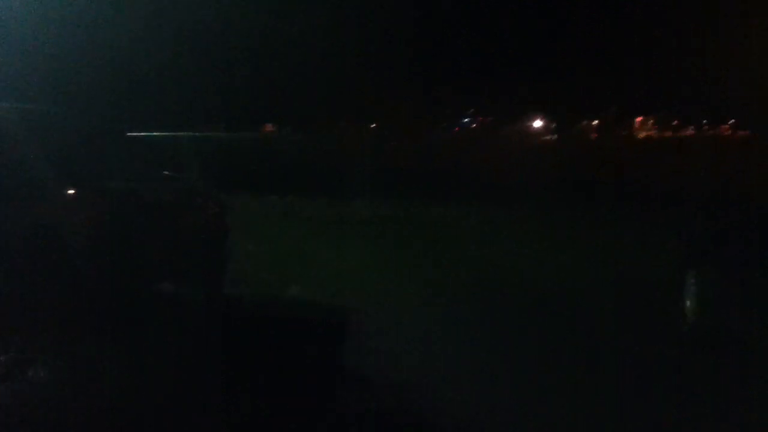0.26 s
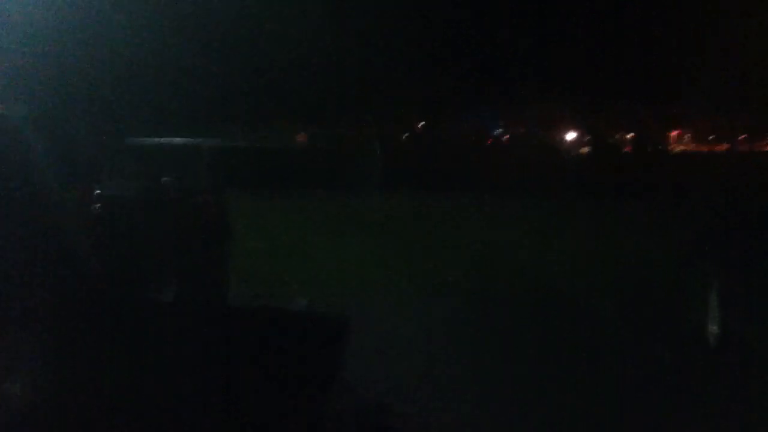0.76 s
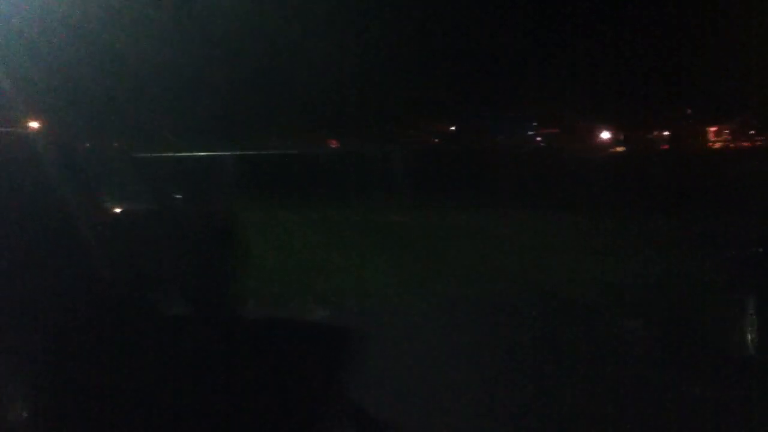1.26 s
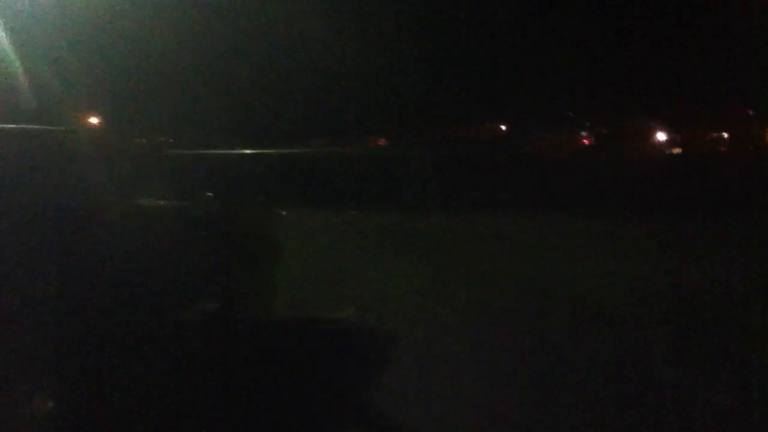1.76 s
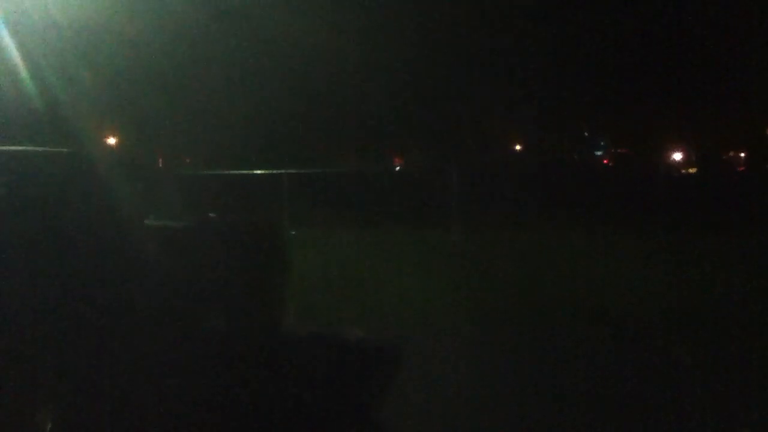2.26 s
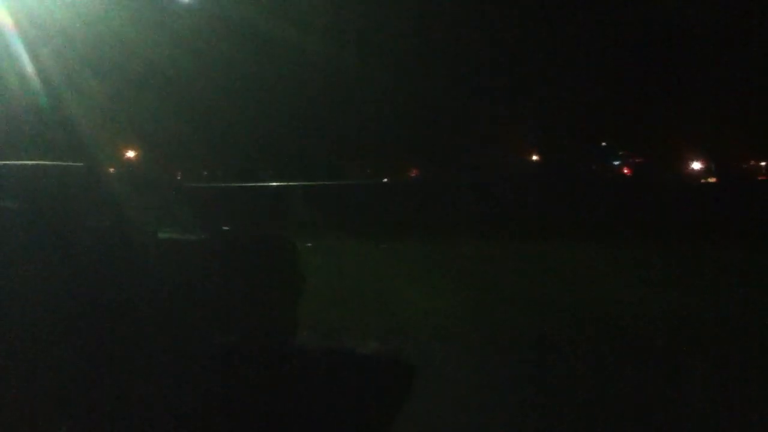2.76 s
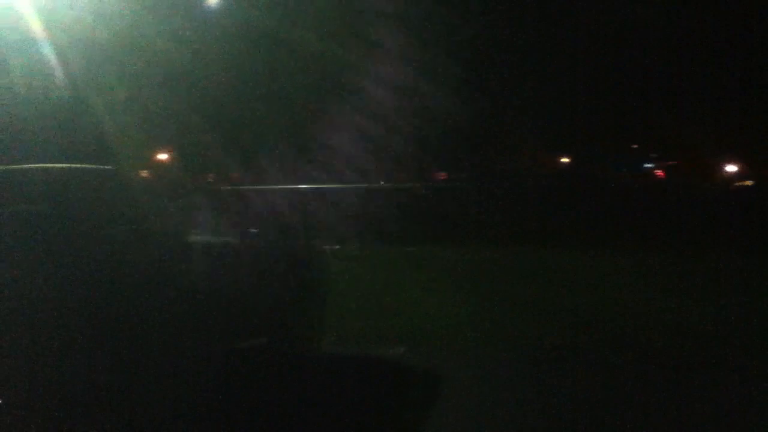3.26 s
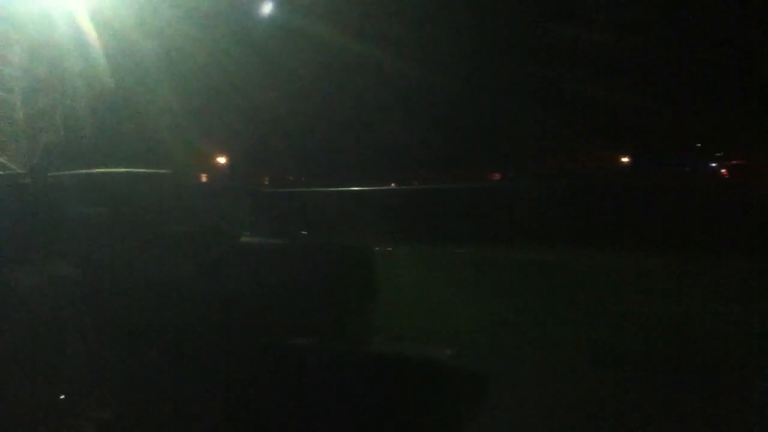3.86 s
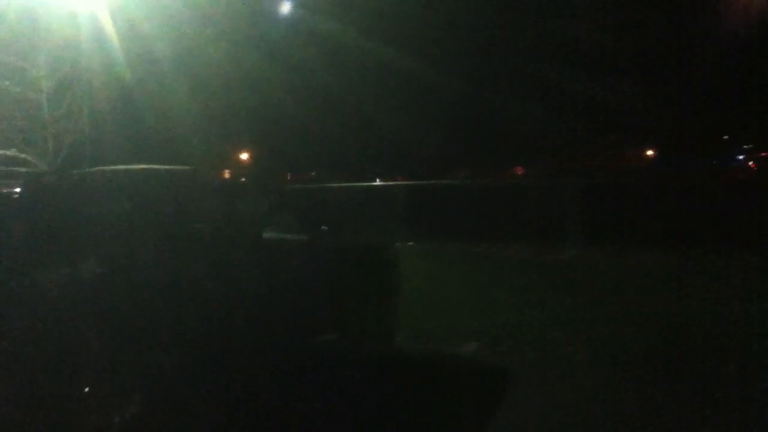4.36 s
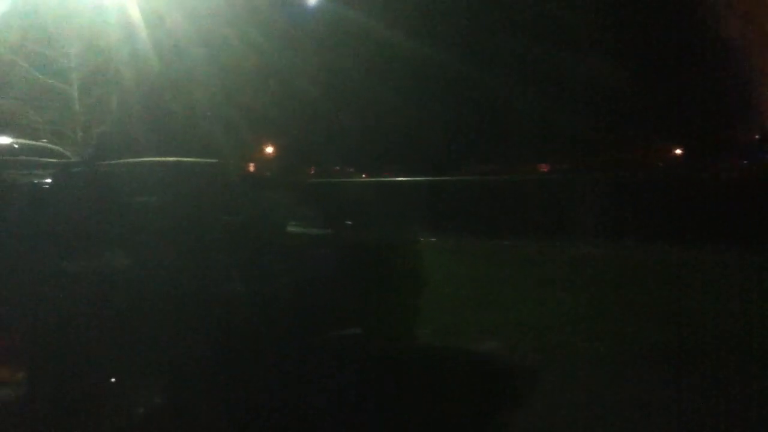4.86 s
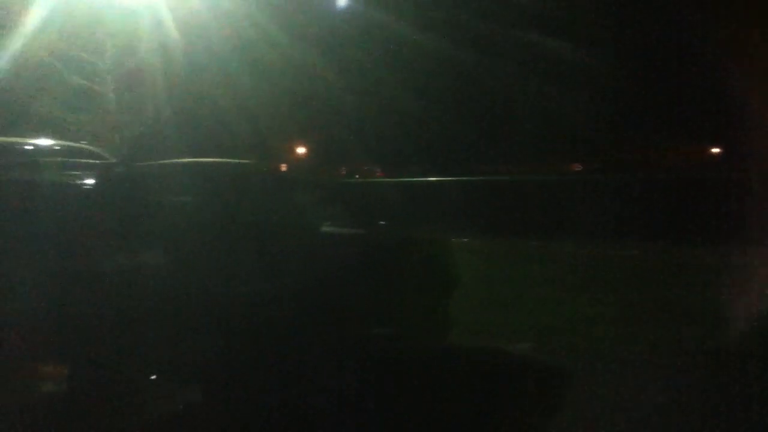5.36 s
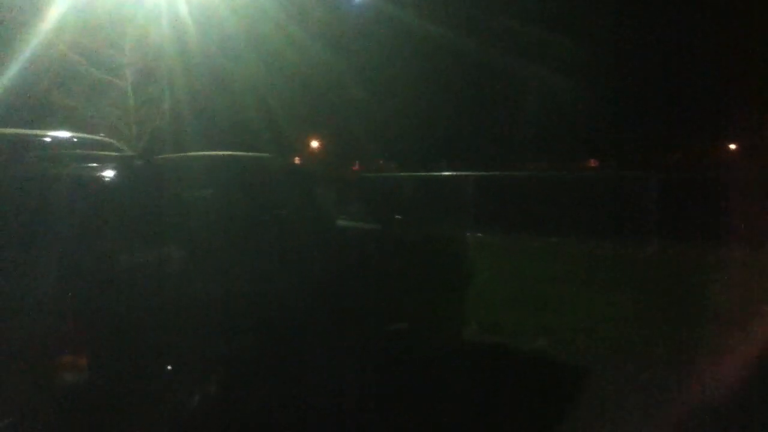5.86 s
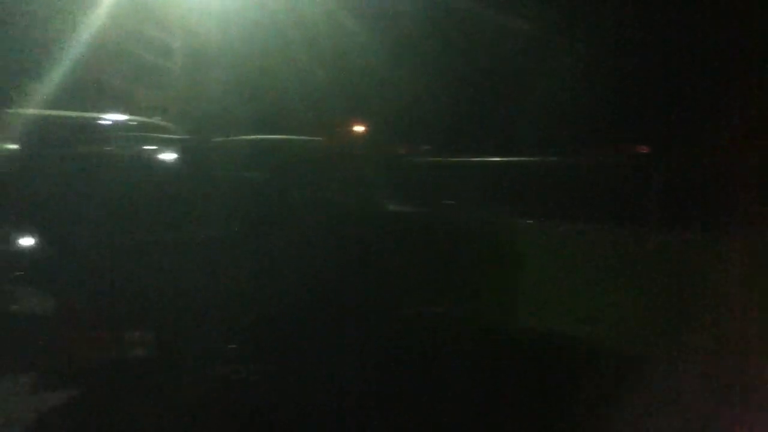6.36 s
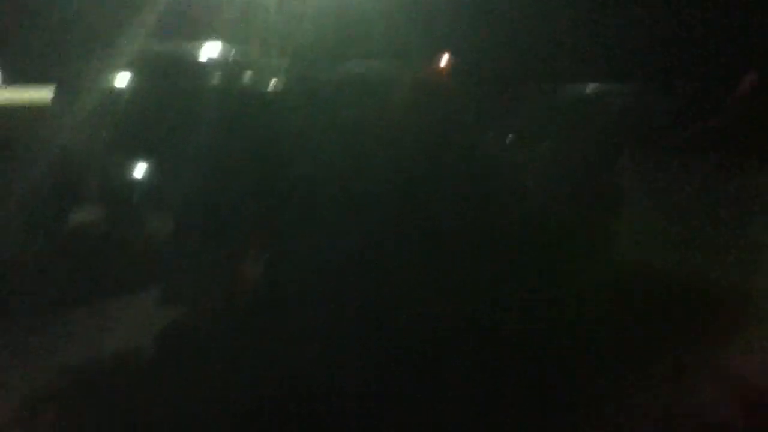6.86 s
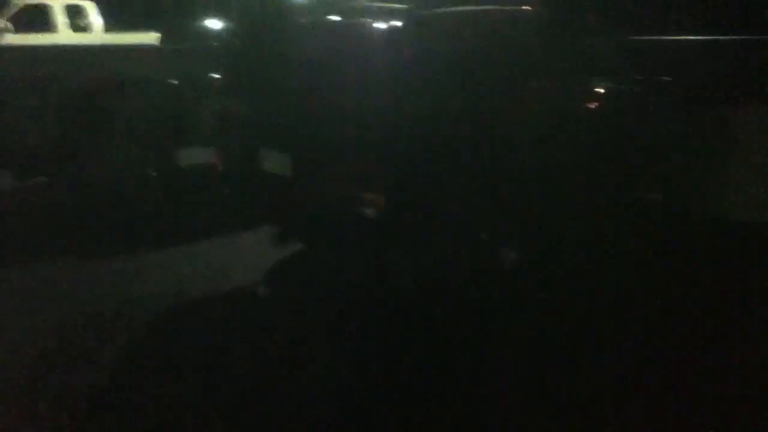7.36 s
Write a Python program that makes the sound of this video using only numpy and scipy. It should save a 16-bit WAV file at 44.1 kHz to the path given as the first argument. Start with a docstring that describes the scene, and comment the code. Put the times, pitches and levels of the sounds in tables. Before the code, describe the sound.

A pickup truck with an open exhaust pulls hard across an outdoor lot, its low drone rising in pitch. It shifts up, the pitch drops, and it climbs again, growing louder, raspier and more crackly. Then the throttle shuts and the revs fall to a quiet burble. At the very end a sharp knock and a few small taps hit the microphone, briefly muffling the sound.

```python
"""An open lot at night: a straight-piped pickup pulls through two gears, then lifts off.
Its periodic firing gives a harmonic drone. Uneven pulses of turbulent gas excite the pipe into a burble,
a bark and a rasp, which the lot scatters; under load the pulses steepen into cracks.
A faint electronic hiss lies beneath. At the end a hand knocks a camera and covers its microphone."""
import sys
import numpy as np
from scipy import signal
from scipy.fft import rfft, irfft
from scipy.io import wavfile

SR = 44100
rng = np.random.default_rng(int(sys.argv[2]) if len(sys.argv) > 2 else 0)


def store_wav(level_fs):
    """Save 16-bit WAV to argv[1]."""
    pcm = np.round(np.clip(np.atleast_2d(level_fs), -1, 1) * 32767)
    wavfile.write(sys.argv[1], SR, pcm.T.astype(np.int16))


N = 336042
TIME = np.arange(N) / SR

# one cylinder bank's pulse rate in each gear; it flares as the clutch bites: (time [s], rate [Hz])
LOW_GEAR_RATE = [(0, 93.2), (.25, 97.8), (.5, 100.4), (1, 103), (1.4, 106.3), (1.7, 107.5), (2.0, 112)]
HIGH_GEAR_RATE = [(1.9, 61.7), (2.08, 70.5), (2.22, 68.3), (3, 78.5), (4.25, 94.3), (4.5, 96.5),
                  (5.5, 108.3), (5.7, 109.3), (6.08, 108.6)]
# throttle shut, revs falling: (time [s], bank pulse rate [Hz], level [dB])
OVERRUN = [(5.62, 109.1, -55), (5.75, 101.4, -29), (5.9, 92.76, -38), (6.05, 76.95, -41), (6.2, 67.07, -40),
           (6.4, 69.88, -49), (7.2, 79.63, -50.5), (7.62, 78.2, -59)]
# pipe resonances that shape the low-gear drone: (frequency [Hz], level [dB])
PIPE_RESPONSE = [(90, -34), (98, -30.5), (120, -29), (182, -27.5), (198, -34.5), (224, -31), (276, -47),
                 (290, -41), (322, -40), (338, -47), (364, -39.5), (410, -54.5), (450, -54)]
# strength of that drone: (time [s], gain [dB])
DRONE_DRIVE = [(0, -3), (.6, -10.5), (1.1, -10.5), (1.7, -4), (2.0, -3)]
# uneven firing in low gear: (multiple of half the bank pulse rate, level [dB])
HALF_ORDERS = [(3, -49), (5, -52)]
# weak orders from unequal cylinders: (multiple of the engine cycle rate, level [dB])
SIDE_ORDERS = [(4, -48), (5, -53), (8, -58)]
# the bank's fundamental in high gear: (time [s], level [dB])
BANK_NOTE = [(1.9, -49.5), (2.75, -53), (2.9, -43), (3.1, -49), (3.25, -37), (3.38, -44), (3.48, -38.5),
             (3.85, -43), (3.96, -31), (4.07, -37), (4.17, -31.5), (4.26, -34), (4.46, -26), (4.6, -32),
             (4.73, -26), (4.83, -28.5), (4.91, -41.5), (5.08, -29.5), (5.18, -34.5), (5.28, -29.5),
             (5.37, -27), (5.44, -32.5), (5.56, -28), (5.7, -33.5), (5.88, -30), (6.04, -39), (6.08, -57)]
# throbs of the firing note, an octave higher: (time [s], half length [s], peak level [dB])
THROBS = [(1.945, 0.033, -30), (2.076, 0.069, -26), (2.287, 0.042, -28.5), (2.442, 0.067, -27.5),
          (2.664, 0.09, -25), (2.884, 0.1, -31), (3.023, 0.058, -31), (3.198, 0.1, -27.5),
          (3.35, 0.045, -30), (3.488, 0.081, -32.5), (3.634, 0.057, -38.5), (3.767, 0.067, -34.5),
          (3.995, 0.058, -36), (4.134, 0.06, -34), (4.35, 0.11, -39.5), (4.652, 0.081, -31),
          (4.85, 0.1, -32), (5.163, 0.096, -33), (5.39, 0.12, -37), (5.585, 0.07, -34.5),
          (5.747, 0.078, -36), (5.944, 0.095, -41.5)]
# upper harmonics in high gear: (time [s], third [dB], fourth [dB], fifth [dB])
GROWL = [(1.9, -52, -62, -66), (2.05, -53, -54, -64), (2.17, -53, -43, -66), (2.35, -45, -45.5, -66),
         (2.47, -40.5, -55, -68), (2.78, -37.5, -60, -74), (3.0, -49.5, -60, -77), (3.26, -54.5, -54, -60),
         (3.6, -45.5, -58, -63), (3.86, -50.5, -49.5, -62), (4.07, -66, -54, -65), (4.25, -52, -54.5, -62),
         (4.42, -49, -59, -65), (4.55, -57, -63, -63), (4.74, -51, -63, -54), (4.92, -52, -66, -55.5),
         (5.42, -47, -66, -50), (5.66, -49.5, -69, -61), (5.78, -67, -65, -62), (6.08, -74, -70, -59)]
# loudness of the exhaust, set by throttle and distance: (time [s], level [dB])
EFFORT = [(0.0, -45.5), (1.3, -39.5), (1.47, -36), (1.55, -36.5), (1.7, -35.5), (1.9, -35.5), (2.3, -38.5),
          (2.44, -34), (2.62, -37.5), (2.93, -36.5), (3.1, -36), (3.35, -34.5), (3.57, -31.5), (3.85, -32),
          (4.12, -30.5), (4.25, -31), (4.55, -31.5), (5.07, -31), (5.23, -28.5), (5.32, -29.5), (5.43, -28),
          (5.6, -31), (5.82, -35), (5.93, -34), (6.2, -41.5), (6.62, -55), (7.43, -59.5)]
# exhaust voices: (level at full effort [dB], slope [dB per dB of effort], idling floor [dB])
BARK_LAW = (-45.5, 0.3, -53.5)
HONK_LAW = (-39.5, 0.56, -59)
EDGE_LAW = (-41.5, 1.33, -65)
# timbre as the truck moves: (time [s], rasp tilt [dB], honk gain [dB], bark gain [dB], bark peak [Hz])
ASPECT = [(0, 0.5, -5.5, -5, 645), (1.2, -0.5, -4.5, -0.5, 635), (1.8, -2, -2, 1.5, 735),
          (2.5, 0.5, -5.5, 3, 920), (3.55, -1.5, 0.5, 2, 860), (4.1, 0.5, 2, -4, 840),
          (4.7, -1.5, 1, -1, 804), (5.45, 2, -2.5, 0.5, 825), (5.8, 1, -2.5, 3.5, 814),
          (6.45, -1, -4.5, -3, 800), (7.4, -2.5, -10, -4.5, 739)]
# burble of uneven combustion, strongest near the gear change: (time [s], level [dB])
BURBLE = [(0, -41), (1.2, -39), (1.8, -32.5), (2.6, -41.5), (3.3, -39.5), (3.6, -37), (5.3, -50),
          (5.95, -41.5), (6.25, -47), (6.5, -49.5), (7.4, -49)]
# passing resonances of the pipe and its tip:
# (time [s], half length [s], frequency [Hz], glide [Hz/s], bandwidth [Hz], level [dB])
PIPE_MODES = [(.2, .35, 3130, 0, 130, -57), (1.2, .2, 1315, 0, 90, -53), (1.46, .04, 2500, 0, 1000, -41),
              (1.47, .05, 1720, 0, 200, -46), (1.67, .07, 2790, 0, 190, -42.5),
              (2.445, .035, 1750, 0, 160, -41), (2.445, .04, 2390, 0, 140, -42),
              (2.5, .17, 3130, 0, 160, -47), (2.63, .16, 2700, -200, 240, -45),
              (3.0, .07, 3930, 0, 240, -46), (3.2, .35, 3400, 200, 1000, -40),
              (3.55, .1, 3730, 0, 380, -38.5), (3.68, .14, 2510, 0, 130, -40.5),
              (4.05, .16, 2300, -150, 120, -39.5), (4.1, .1, 3350, 0, 900, -39),
              (3.9, .5, 1320, 0, 160, -48), (4.62, .25, 1050, 0, 600, -45),
              (4.9, .35, 3170, 130, 260, -41.5), (5.35, .35, 800, 0, 110, -45.5),
              (5.3, .18, 3980, -80, 140, -42.5), (5.46, .12, 3250, 0, 160, -41),
              (5.45, .09, 3650, 0, 900, -38), (5.48, .11, 5340, -120, 90, -44.5),
              (5.7, .17, 2640, -200, 260, -44), (5.8, .35, 3240, 0, 150, -48.5)]
# spells in which the pulses steepen into shocks: (time [s], half length [s], level [dB])
CRACK_SPELLS = [(1.7, .07, -26), (2.44, .035, -24), (3.5, .025, -18), (3.6, .07, -22), (4.11, .035, -15),
                (5.24, .04, -15), (5.35, .4, -26), (5.465, .045, -12), (5.58, .025, -19), (5.9, .08, -25)]
# spectra of the exhaust's voices: (frequency [Hz], relative level [dB])
BURBLE_SPECTRUM = [(20, -31), (40, -10.5), (65, -4.5), (100, 4), (150, 4), (200, 1), (255, -3),
                   (320, -12.5), (420, -16.5), (600, -28.5), (1200, -68)]
BARK_SPECTRUM = [(250, -30), (420, -15.5), (530, -0.5), (680, -1), (820, -2.5), (940, 0.5), (1080, -1.5),
                 (1300, 3), (3000, -59)]
HONK_SPECTRUM = [(30, -45), (300, -22), (600, -20), (800, -4), (1000, -4), (1180, -3), (1320, 1.5),
                 (1430, -5), (1600, -11), (2500, -40)]
LOW_RASP_SPECTRUM = [(900, -51), (1450, -11), (1700, -2), (2000, -2.5), (2400, -2), (2750, -2.5),
                     (3200, -3), (5000, -64.5)]
HIGH_RASP_SPECTRUM = [(1500, -33.5), (2400, -1.5), (2750, -0.5), (3200, 0.5), (3900, -1), (4400, -9.5),
                      (5000, -13.5), (6500, -27.5), (12000, -67)]
EDGE_SPECTRUM = [(2500, -1.5), (4200, 9.5), (5000, 6), (5800, 3), (6600, -5), (8000, -7.5), (9300, -18),
                 (10500, -44), (16000, -59)]
CRACK_SPECTRUM = [(30, -50), (300, -26), (1200, -16), (2200, -5), (3400, 0), (4300, -5), (5500, -13),
                  (6700, -29), (8500, -34), (10500, -54), (16000, -74)]
# brief rings and rushes: (time [s], peak level [dB], frequency [Hz], bandwidth [Hz], rise [s], decay [s])
NOISE_BANDS = [(1.63, -42.5, 704, 170, 0.022, 0.19), (1.602, -36.5, 300, 400, 0.058, 0.047),
               (6.0, -46, 259, 29.8, 0.075, 0.35), (6.095, -53, 9060, 1188, 0.0042, 0.043),
               (6.095, -51, 6600, 1400, .003, 0.024), (7.26, -57.5, 5556, 6480, 0.11, 0.064)]
# blows on the camera's case: (time [s], click level [dB])
KNOCK = (7.4586, 1)
TAPS = [(7.4733, -36), (7.524, -45), (7.5455, -45), (7.5965, -58)]
# spectra of those blows and of the hiss: (frequency [Hz], relative level [dB])
KNOCK_SPECTRUM = [(40, -49), (180, -11), (600, 2.5), (1020, -2), (1220, -13), (1450, -9.5), (3400, -4.5),
                  (4900, -11), (5400, -21), (7000, -2.5), (8700, -10), (10500, -19), (11500, -10.5),
                  (16000, -34)]
TAP_SPECTRUM = [(100, -7), (1000, 14), (1600, -2), (2500, 1), (4000, -13), (6000, -31), (8000, -40),
                (16000, -38)]
HISS_SPECTRUM = [(20, -2), (300, 27), (2000, 15), (6000, 9.5), (9000, 9.5), (10500, 4.5), (11500, 4.5),
                 (14000, -1), (15800, -21)]
# a hand closes over the microphone: (time [s], gain [dB])
HAND_COVER = [(7.455, 0), (7.47, -19), (7.52, -0.5), (7.56, -19), (7.62, 0.5)]


def crank(shift_s=1.95, flutter=.004):
    """Phase is the integral of frequency: one bank's pulse cycles through both gears and the overrun."""
    in_low_gear = TIME < shift_s
    gear_hz = np.where(in_low_gear, curves(LOW_GEAR_RATE)[0], curves(HIGH_GEAR_RATE)[0])
    hz = np.where(TIME < OVERRUN[0][0], gear_hz, curves(OVERRUN)[0])
    return np.cumsum(hz * (1 + flutter * wander(30) * in_low_gear)) / SR


def engine_tones(turns):
    """Periodic firing radiates a harmonic series; unequal cylinders add orders between its lines."""
    low_turns = np.cumsum(curves(LOW_GEAR_RATE)[0]) / SR
    high_turns = np.cumsum(curves(HIGH_GEAR_RATE)[0]) / SR
    high_turns = high_turns + turns[N // 2] - high_turns[N // 2]  # in step with the firing
    pull = drone(low_turns) + boom(high_turns) + growl(high_turns)
    cycles = high_turns / 3  # a bank fires three times per engine cycle
    sides = sum(amp(db) * (1 + .35 * wander(6)) * np.sin(2 * np.pi * (k * cycles + rng.random()))
                for k, db in SIDE_ORDERS)
    falling = amp(curves(OVERRUN)[1]) * (fading(depth=1, hz=9.4) * np.exp(2j * np.pi * turns)).imag
    return pull + np.sqrt(2) * sides * gate(GROWL, .82) + falling * gate(OVERRUN, .08)


def drone(turns, roll_off_db=-4, odd_db=-2, echo_depth=.27, echo_hz=7):
    """Resonance: low-gear harmonics swell as they cross the pipe's modes. Unequal banks give odd ones."""
    hz, harmonics = curves(LOW_GEAR_RATE)[0], np.zeros(N)
    for k in range(1, 5):
        tone = np.exp(1j * (2 * np.pi * k * turns - np.pi / 4))
        gain = amp(level(PIPE_RESPONSE, k * hz) + roll_off_db * (k - 1) + odd_db * (k % 2))
        harmonics += gain * (tone * fading(echo_depth * k, echo_hz)).imag  # upper ones fade most
    halves = sum(amp(db) * (np.exp(1j * np.pi * k * turns) * fading(echo_depth, echo_hz)).imag
                 for k, db in HALF_ORDERS)
    return np.sqrt(2) * (amp(curves(DRONE_DRIVE)[0]) * harmonics + halves) * gate(DRONE_DRIVE, .013)


def boom(turns, shake_rad=.06):
    """Superposition in high gear: one bank's fundamental and the throbbing octave of both banks."""
    phase = 2 * np.pi * turns
    bank_gain = amp(curves(BANK_NOTE)[0]) * gate(BANK_NOTE, .022)
    bank = bank_gain * np.sin(phase - np.pi / 4 + shake_rad * wander(14))
    throbs = sum(amp(db) * swell(s, half) for s, half, db in THROBS)
    octave = throbs * np.sin(2 * phase - np.pi / 4 + 2 * shake_rad * wander(14))
    return np.sqrt(2) * (bank + octave)


def growl(turns, shake_rad=.15):
    """Harmonics three to five, locked to the pulse rate, climb with the revs in high gear."""
    shake = shake_rad * wander(10)
    tones = sum(amp(db) * np.sin(2 * np.pi * k * turns + shake) for k, db in enumerate(curves(GROWL), 3))
    return np.sqrt(2) * tones * gate(GROWL, .02)


def exhaust(turns):
    """Source and filter: firing pulses ring the open pipe as burble, bark, honk, rasp and bright edge."""
    tilt_db, honk_db, bark_db, bark_hz = curves(ASPECT)
    blasts = firing(turns, uneven_db=2.2, gas_share=.9, puff_strokes=1)
    jet = firing(turns, uneven_db=2.2, gas_share=.92, puff_strokes=1)
    lumps = firing(turns, uneven_db=2, gas_share=1, puff_strokes=.9)
    burble = amp(curves(BURBLE)[0]) * lot(coloured(lumps, BURBLE_SPECTRUM), wet_db=.5, t60=.4)
    blasts = lot(blasts, wet_db=7.5, t60=.93)
    jet = lot(jet, wet_db=7.5, t60=1)
    bark_band = coloured(blasts, BARK_SPECTRUM)
    bark_peak = amp(-3) * unit(resonate(bark_band, bark_hz, width_hz=280))
    bark = effort_gain(BARK_LAW) * amp(bark_db) * unit(bark_band + bark_peak)
    honk = effort_gain(HONK_LAW) * amp(honk_db) * coloured(blasts, HONK_SPECTRUM)
    low_rasp = amp(-3 - tilt_db) * coloured(jet, LOW_RASP_SPECTRUM)
    high_rasp = amp(-3.5 + tilt_db) * coloured(blasts, HIGH_RASP_SPECTRUM)
    rasp = amp(curves(EFFORT)[0]) * (low_rasp + high_rasp)
    edge = effort_gain(EDGE_LAW) * coloured(jet, EDGE_SPECTRUM)
    return burble + bark + honk + gusts(turns) * (rasp + edge + pipe_rings(blasts))


def firing(turns, uneven_db, gas_share, puff_strokes):
    """Pulsed excitation: six cylinders fire in turn, one bank louder, each trailing turbulent gas."""
    cylinder_db = np.array([6.5, -9, -2, -3, 6.5, -15])
    stroke = np.floor(2 * turns).astype(int)
    size = amp(cylinder_db[stroke % 6] + uneven_db * np.clip(rng.standard_normal(N), -2, 1)[stroke])
    puffs = size * np.exp(-(2 * turns % 1) / puff_strokes) * rng.standard_normal(N)
    kicks = pulses(2 * turns) * np.roll(size, -1)
    return np.sqrt(1 - gas_share) * unit(kicks) + np.sqrt(gas_share) * unit(puffs)


def effort_gain(law, full_effort_db=-30):
    """Power law: a voice of the exhaust grows with effort above its idling floor."""
    full_db, slope, idle_db = law
    return np.hypot(amp(full_db + slope * (curves(EFFORT)[0] - full_effort_db)), amp(idle_db))


def gusts(turns, depth=.95, rise_strokes=.035, decay_strokes=.17):
    """Amplitude modulation: in high gear each firing pulse briefly lifts the rasp."""
    phase = 2 * turns % 1
    gust = (1 - np.exp(-phase / rise_strokes)) ** 2 * np.exp(-phase / decay_strokes)
    return unit(1 + depth * gate(GROWL, .3) * gust)


def pipe_rings(blasts, top_hz=5500):
    """Forced resonance: the pulses drive the pipe's hollow and metallic modes; some glide a little."""
    out = np.zeros(N)
    drive = signal.sosfilt(signal.butter(4, top_hz, fs=SR, output="sos"), blasts)
    for s, half, hz, glide, width, db in PIPE_MODES:
        at = np.flatnonzero(abs(TIME - s) < 2.5 * half)
        centre, stage_width = hz + glide * (TIME[at] - s), width * np.sqrt(2)
        ring = resonate(resonate(drive[at], centre, stage_width), centre, stage_width)
        out[at] += amp(db) * swell(s, half)[at] * unit(ring)
    return out


def cracks(turns, jitter_turns=.016, scatter_db=1.8):
    """Nonlinear steepening: the near bank's pulses arrive as shocks, loudest in short spells."""
    spells = sum(amp(db) * swell(s, half) for s, half, db in CRACK_SPELLS)
    under_load = amp(curves(EFFORT)[0] + 3) * gate(GROWL, 1)
    shock = response(CRACK_SPECTRUM)
    scatter = amp(scatter_db * np.clip(rng.standard_normal(N), -2, 1))
    arrivals = pulses(turns + jitter_turns * wander(47.5))
    return through(arrivals * (spells + under_load) * scatter, shock / abs(shock).max())


def lot(x, wet_db, t60, positions=20):
    """Scattering: ground, vehicles and trees add echoes whose paths change as the truck moves."""
    wet, hop = np.zeros(N + SR), N // (positions - 1) + 1
    for k in range(positions):
        at = np.arange(max(0, (k - 1) * hop), min(N, (k + 1) * hop))
        paths = rng.standard_normal(SR) * (rng.random(SR) < .05) * amp(-60 * TIME[:SR] / t60)
        crossfade = np.cos(np.pi / 2 * (at / hop - k))
        echoes = signal.fftconvolve(x[at] * crossfade, paths / np.linalg.norm(paths))
        wet[at[0]:at[0] + len(echoes)] += echoes
    wet[:SR] += wet[N:]  # the engine has long been running, so echoes are there from the start
    return unit(unit(x) + amp(wet_db) * unit(wet[:N]))


def fading(depth, hz):
    """Interference: the complex gain of a tone that adds to its own shifting echoes."""
    return (1 + depth * (wander(hz) + 1j * wander(hz))) / np.sqrt(1 + 2 * depth ** 2)


def rings_and_rushes():
    """Band-limited noise, more pitched the narrower it is: brief howls, a thin clink, a faint rustle."""
    f, out = np.fft.rfftfreq(N, 1 / SR), np.zeros(N)
    for s, db, hz, width, rise, decay in NOISE_BANDS:
        band = unit(irfft(rfft(rng.standard_normal(N)) / (1 + (2 * (f - hz) / width) ** 2), N))
        out += amp(db) * band * np.exp(-np.maximum((s - TIME) / rise, (TIME - s) / decay))
    return out


def handling(rows, spectrum, rattle_db, rattle_s):
    """Impact excitation: each blow on the camera's case gives a dry click and a short rattle."""
    blows = np.zeros(N)
    for s, db in rows:
        blows[round(s * SR)] += amp(db)
    # all-pass dispersion: the case spreads each click over a fraction of a millisecond
    click = signal.lfilter([.5, -.8, 1], [1, -.8, .5], response(spectrum))
    rattle = rng.standard_normal(SR // 8) * np.exp(-TIME[:SR // 8] / rattle_s)
    clicks = through(blows, click / abs(click).max())
    return clicks + amp(rattle_db) * through(clicks, rattle / np.linalg.norm(rattle))


def electronics(hiss_db=-55, whine_db=-69, whine_hz=14994):
    """Electronic self-noise: a steady hiss and a thin high whine."""
    whine = amp(whine_db) * np.sqrt(2) * np.sin(2 * np.pi * whine_hz * TIME)
    return amp(hiss_db) * through(rng.standard_normal(N), response(HISS_SPECTRUM)) + whine


def amp(db):
    """Decibels to amplitude ratio."""
    return 10 ** (np.asarray(db) / 20)


def unit(x):
    """Normalisation to rms 1."""
    return x / np.sqrt(np.mean(x ** 2) + 1e-20)


def curves(rows):
    """Linear interpolation in time of each column of a table."""
    s, *columns = np.transpose(rows)
    return [np.interp(TIME, s, c) for c in columns]


def level(spectrum, hz):
    """Interpolation of a spectrum in log frequency, in dB."""
    f, db = np.transpose(spectrum)
    return np.interp(np.log(hz), np.log(f), db)


def gate(rows, fade_s):
    """Trapezoidal window over a table's span; already open if the table starts with the scene."""
    start = rows[0][0] if rows[0][0] > .1 else -1
    return np.clip((TIME - start) / fade_s, 0, 1) * np.clip((rows[-1][0] - TIME) / fade_s, 0, 1)


def swell(s, half):
    """Gaussian envelope of height 1 at time s."""
    return np.exp(-np.minimum(((TIME - s) / half) ** 2, 50))


def wander(hz):
    """Low-pass noise of rms 1: a random drift up to about the given rate."""
    f = np.fft.rfftfreq(N, 1 / SR)
    return unit(irfft(rfft(rng.standard_normal(N)) / (1 + (f / hz) ** 4), N))


def pulses(turns):
    """Impulse train: one pulse per whole turn, shared between the two nearest samples."""
    at = np.flatnonzero(np.diff(np.floor(turns)) > 0)
    late = (np.floor(turns[at + 1]) - turns[at]) / (turns[at + 1] - turns[at])
    out = np.zeros(N)
    out[at], out[at + 1] = 1 - late, late
    return out


def response(spectrum, size=4096):
    """Minimum-phase impulse response of energy 1 with the given spectrum."""
    f = abs(np.fft.fftfreq(size, 1 / SR))
    log_gain = np.log(amp(level(spectrum, f + 1)))
    h = np.fft.ifft(np.exp(np.conj(signal.hilbert(log_gain)))).real[:size // 2]
    return h / np.linalg.norm(h)


def through(x, h):
    """Convolution with an impulse response."""
    return signal.oaconvolve(x, h)[:N]


def coloured(x, spectrum):
    """Linear filtering by a spectrum, normalised to rms 1."""
    return unit(through(x, response(spectrum)))


def resonate(x, hz, width_hz):
    """Damped resonator of gain 1 whose centre follows the curve hz."""
    carrier = np.exp(2j * np.pi * np.cumsum(hz) / SR)
    pole = np.exp(-np.pi * width_hz / SR)
    return 2 * (carrier * signal.lfilter([1 - pole], [1, -pole], x / carrier)).real


def scene():
    """Superposition of truck and hiss, attenuated at the end by the hand that knocks the camera."""
    turns = crank()
    mix = engine_tones(turns) + exhaust(turns) + cracks(turns) + rings_and_rushes() + electronics()
    knock = handling([KNOCK], KNOCK_SPECTRUM, rattle_db=-19, rattle_s=.002)
    taps = handling(TAPS, TAP_SPECTRUM, rattle_db=6, rattle_s=.0043)
    return (mix * amp(curves(HAND_COVER)[0]) + knock + taps)[None]


def record(dry, ceiling=.7, cutoff_hz=16000):
    """Hard clipping flattens the peaks; a low-pass filter limits the band."""
    low_pass = signal.firwin(255, cutoff_hz, window=("kaiser", 9), fs=SR)
    return signal.oaconvolve(np.clip(dry, -ceiling, ceiling), low_pass[None], "same")


dry = scene()
out = record(dry)
store_wav(out)
```